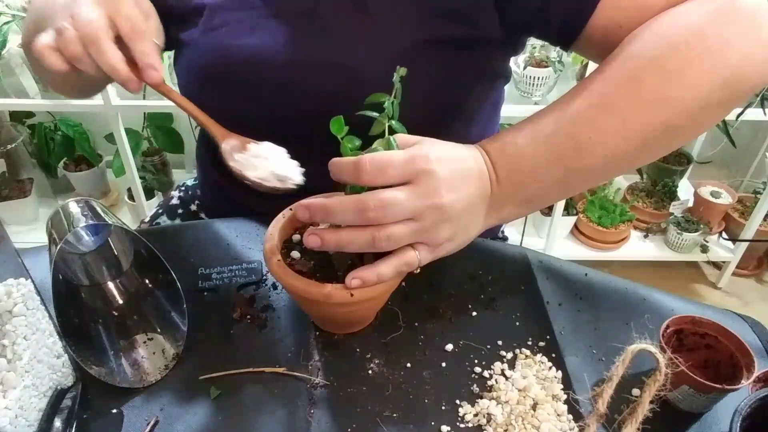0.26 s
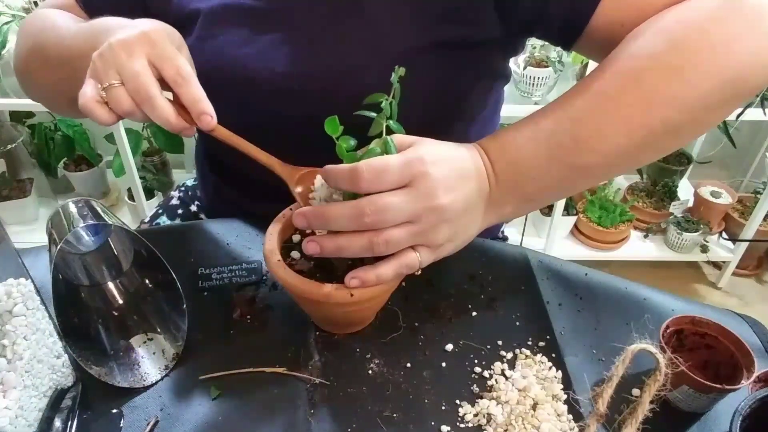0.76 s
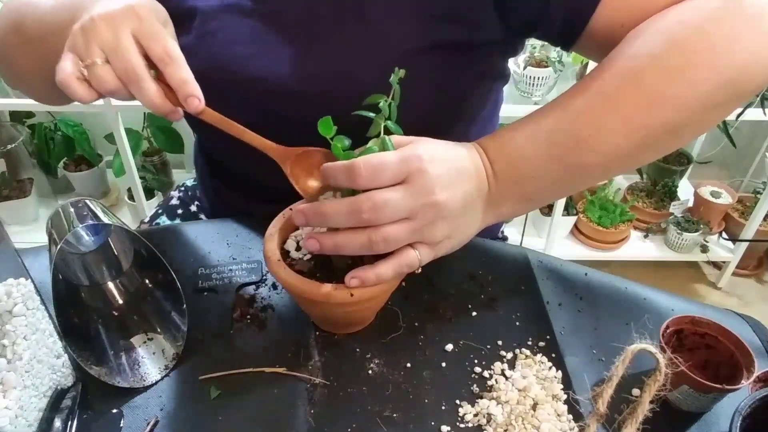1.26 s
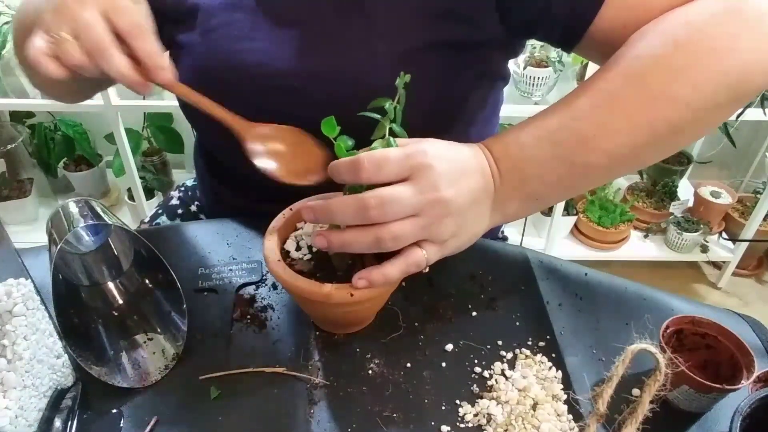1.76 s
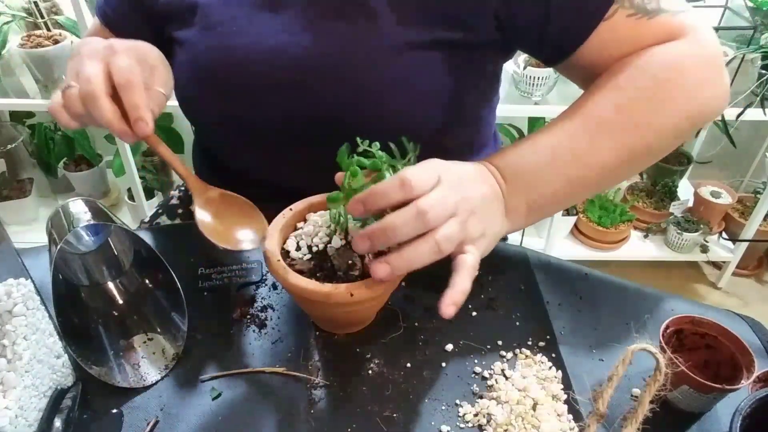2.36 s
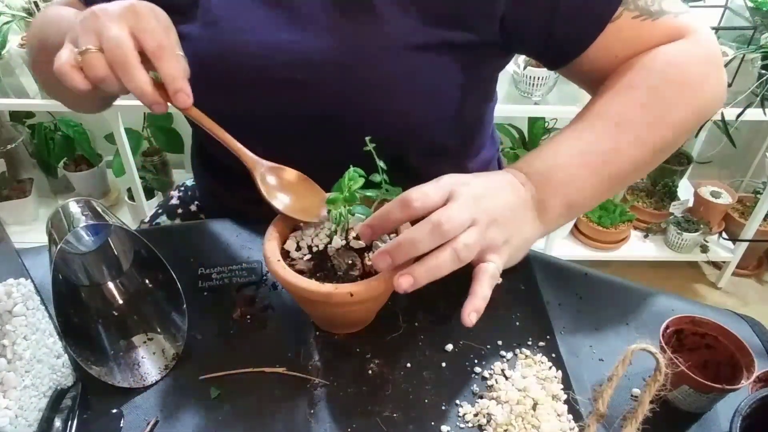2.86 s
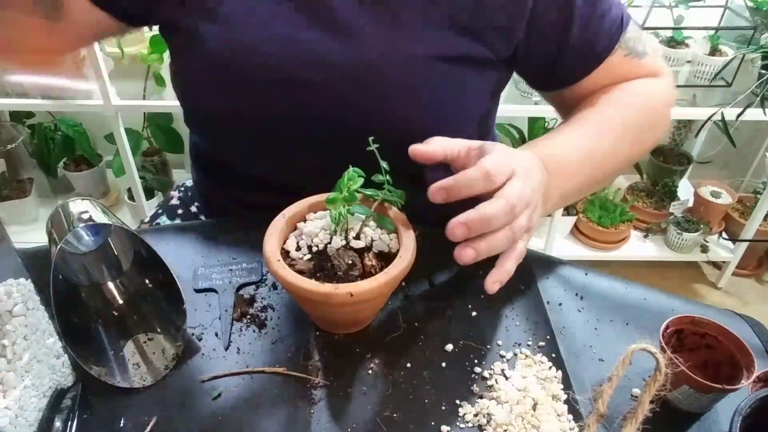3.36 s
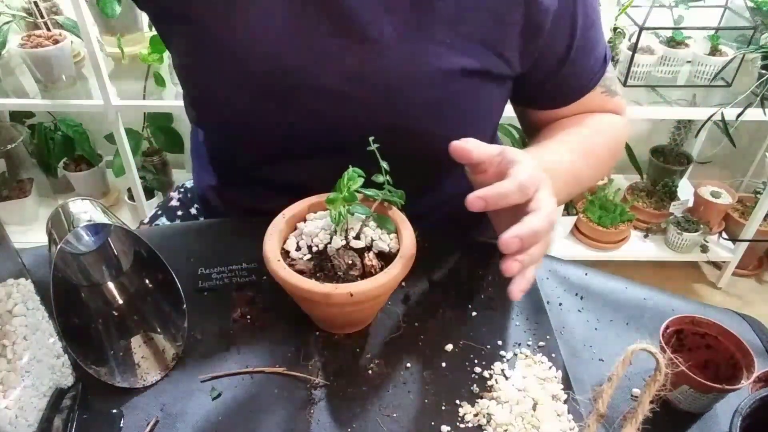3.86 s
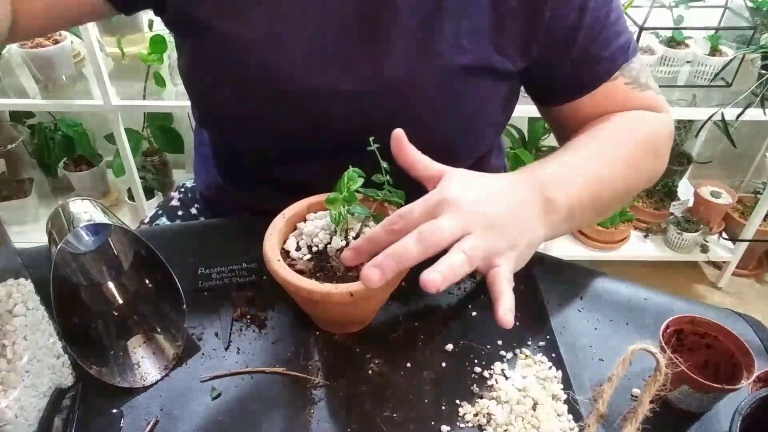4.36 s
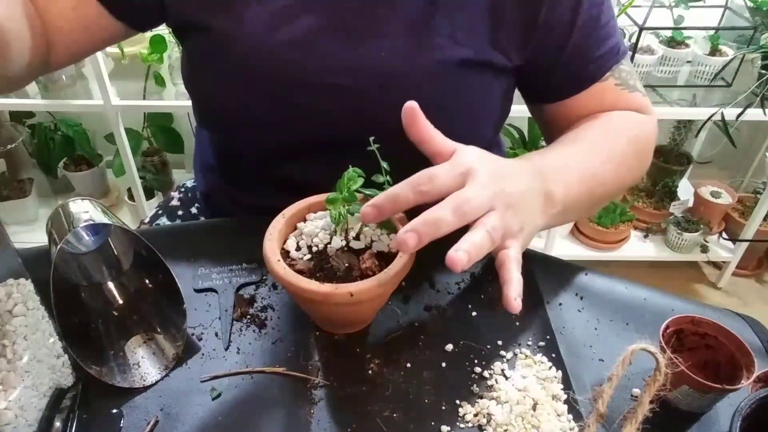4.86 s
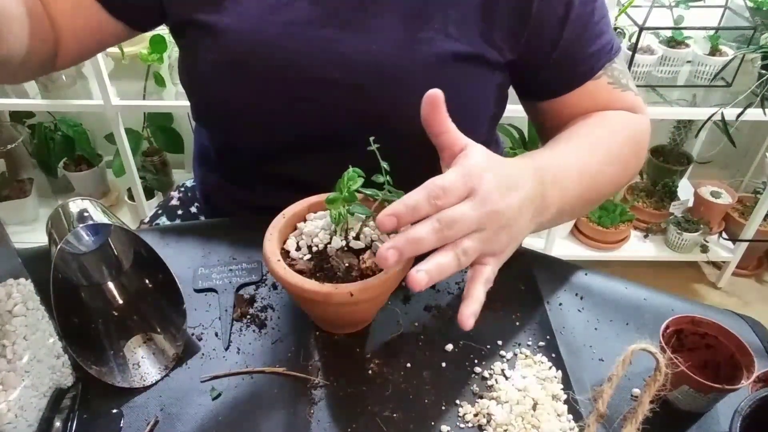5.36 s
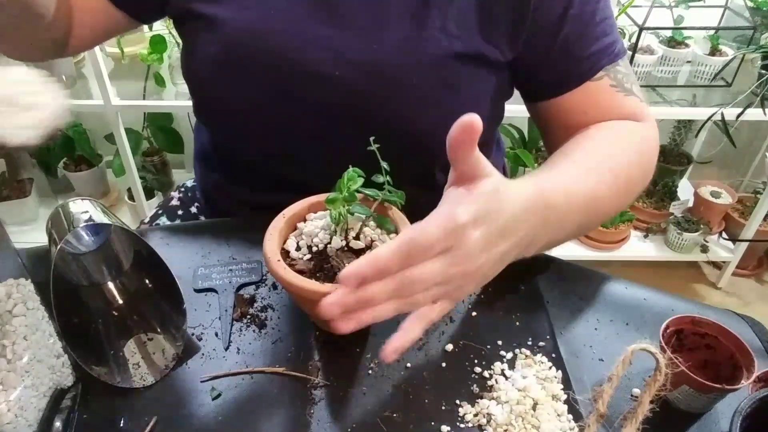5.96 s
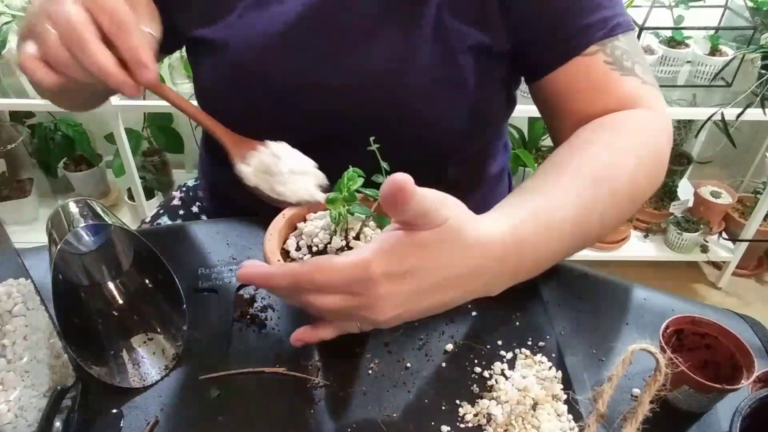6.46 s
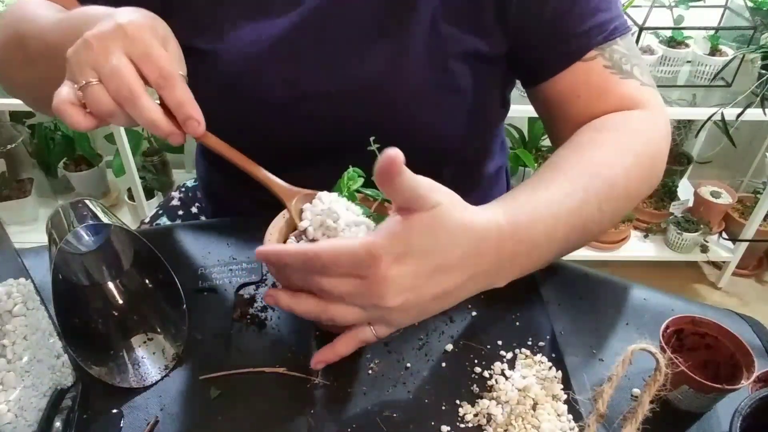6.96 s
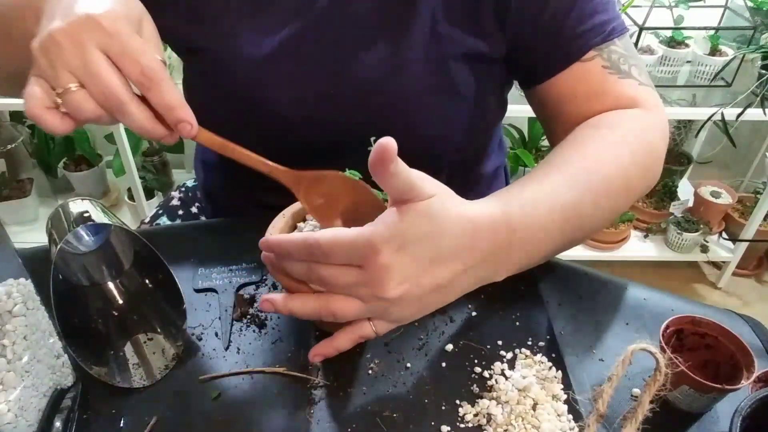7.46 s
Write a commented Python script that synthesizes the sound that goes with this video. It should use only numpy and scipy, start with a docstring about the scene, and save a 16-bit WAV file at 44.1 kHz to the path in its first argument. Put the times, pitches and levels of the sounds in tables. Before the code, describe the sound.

A soft pour of dry white granules into a terracotta pot, small spoon ticks, then near silence over faint hiss. Bright clacks on the pot rim come next, then a burst of much louder crunching as the spoon chatters and digs in a plastic bin of grains. After it quiets, stray grains tick, and another spoonful patters in. Close microphone, small indoor room.

```python
"""Light mineral grains are spooned into a clay pot in a quiet room, close to a small bright microphone.
First the pot bumps dully on the table; in a pour, grains patter on clay as a dense hail of tiny contacts,
spoon taps ring the pot's modes, and the last grains slide and spill. After more taps, the spoon knocks on
a plastic bin, chatters, digs and scrapes through it, with loud cracks made of clicks and short knocks.
Small spills and hard clinks follow, then a second pour. Reflections, hiss and a faint hum come from noise."""
import sys
import numpy as np
from scipy import signal
from scipy.fft import rfft, irfft
from scipy.io import wavfile

SR = 44100
rng = np.random.default_rng(int(sys.argv[2]) if len(sys.argv) > 2 else 0)


def int16_out(signal):
    """Quantize to a 16-bit WAV file."""
    q = np.round(np.clip(np.atleast_2d(signal).T, -1, 1) * 32767)
    wavfile.write(sys.argv[1], SR, q.astype(np.int16))


N = 340011

# Grains poured off the spoon into the pot, one curve per pour.
# Each row: time in seconds, crackle in dB, crunch in dB, rustle in dB.
POURS = [
    [(0.7, -72, -70, -63), (0.72, -66, -67.5, -64), (0.866, -64, -70, -80), (0.88, -46.5, -60, -64),
     (0.925, -43, -55, -64), (0.945, -49.5, -58, -68), (1.03, -42, -47, -56.5), (1.09, -35, -46, -61),
     (1.11, -40, -65, -63), (1.47, -55.5, -58, -67), (1.55, -66.5, -79, -74)],
    [(7.27, -72.5, -79.5, -84), (7.37, -39, -48.5, -62.5), (7.402, -50.5, -57, -65),
     (7.414, -37, -47.5, -62), (7.5, -34, -47.5, -63), (7.514, -42, -43, -67), (7.545, -36, -50, -64),
     (7.575, -34.5, -49, -59), (7.67, -44.5, -60, -63.5), (7.71, -76, -75, -73.5)],
]
# Spoon plunged into the bin, dragged through, lifted away full, one curve per dig.
# Each row: time in seconds, crackle in dB, crunch in dB, rustle in dB.
DIGS = [
    [(3.944, -36, -33.5, -59), (3.962, -23.5, -39.5, -47), (4.022, -19.5, -43, -48.5),
     (4.065, -24.5, -32, -39.5), (4.21, -27, -34.5, -39.5), (4.385, -53.5, -58, -57.5)],
    [(4.385, -48, -56, -58.5), (4.47, -24.5, -29, -46), (4.52, -35, -42, -53.5), (4.59, -29.5, -35, -49.5),
     (4.68, -31.5, -38.5, -53), (4.85, -29, -38.5, -52), (5.06, -31.5, -40.5, -55), (5.138, -20, -34, -50),
     (5.19, -28.5, -34, -54), (5.315, -29, -41.5, -49.5), (5.328, -27, -31.5, -50.5),
     (5.355, -38, -46, -52.5), (5.6, -75.5, -85, -74)],
    [(6.2, -86, -89, -83.5), (6.26, -62, -67.5, -68), (6.32, -54, -61, -67.5), (6.394, -67, -69.5, -75),
     (6.55, -72.5, -83, -77)],
]
# Sparkle against crackle: one value in dB for each pour, then one in dB for each dig.
POUR_SPARKLE_DB = [-11.5, -18]
DIG_SPARKLE_DB = [-14.5, -9.5, -11]
SPILL_SPARKLE_DB = -11.5   # spills and slides, against crackle
# Small spills of grains, sudden and dying away.
# Each row: time of the peak in seconds, crackle in dB, crunch against crackle in dB,
# time to sink 20 dB in seconds.
SPILLS = [(1.556, -46, -14, 0.04), (1.698, -58.5, 4, 0.05), (1.798, -55.5, -20, 0.22),
          (1.995, -64, -11.5, 0.3), (2.079, -61, -13.5, 0.16), (2.245, -72, -20, .15),
          (5.625, -66, -9, 0.2), (5.782, -66.5, -18, 0.2), (5.919, -71.5, -16, 0.5), (6.155, -66, -19, .2),
          (6.452, -66.5, -9, 0.4), (6.685, -71, -12, 2.1), (6.915, -50, -19, 0.05), (6.96, -64, -11, 0.5),
          (7.125, -62.5, -12, 0.3)]
SPILL_RISE_S = 0.016   # time to swell 20 dB
# Grains sliding on the clay wall, swelling before and sinking after a steady stretch.
# Each row: start of the steady stretch in seconds, its end in seconds, contact drive in dB.
SLIDES = [(1.565, 1.63, -91), (2.38, 2.453, -110), (2.487, 2.562, -107), (2.605, 2.719, -111)]
SLIDE_FADE_S = 0.035   # time to swell or sink 20 dB
SLIDE_CRACKLE_DB, SLIDE_CRUNCH_DB = 38, -14   # crackle against the contacts, crunch against the crackle
POUR_RING_DB = -47   # drive of the wall contacts against the crackle
# Loud sharp cracks: even stick-slip chatter of the spoon near 4 s, single loud grains elsewhere.
# Each row: time in seconds, crack peak in dB, knock pitch in Hz, knock drive against crack in dB.
SNAPS = [(0.8555, -38.5, 5820, 3), (0.8779, -24, 5700, -9), (0.8944, -22, 5540, -13.5),
         (0.957, -36, 5840, -1), (1.011, -28, 2814, -4.5), (1.0375, -23.5, 2640, -19),
         (1.0464, -20.5, 5990, -21.5), (1.0554, -27, 4900, -28), (1.2042, -21.5, 3810, -14),
         (1.2271, -25, 6130, 1), (1.3528, -30.5, 6130, -2), (1.3658, -27.5, 3470, -14),
         (1.514, -43, 3150, -16), (1.697, -34.5, 6030, -3), (1.7185, -36, 3850, -16),
         (1.8068, -38, 5630, -13), (3.8362, -29.5, 3090, -13.5), (3.9434, -1, 3120, -10),
         (3.9614, -0.5, 3200, -16.5), (3.9729, -1, 4113, -19.5), (3.9844, -2.5, 5400, -20.5),
         (4.0024, -4.5, 3783, -18), (4.0133, -3.5, 5486, -27), (4.0244, 1.5, 6140, -20),
         (4.0364, -3, 5470, -19.5), (4.0434, -0.5, 4966, -16), (4.0584, -1.5, 5380, -15.5),
         (4.0664, -4, 5865, -17.5), (4.0784, -6.5, 5520, -14), (4.0914, -7.5, 4860, -10.5),
         (4.1274, -7.5, 4380, -8.5), (4.4119, -23.5, 3320, -20.5), (4.5406, -19.5, 3400, 4),
         (4.5795, -6.5, 3910, -4), (4.6527, -14, 3380, -20.5), (4.6616, -9.5, 4560, -23.5),
         (4.7895, -12, 3640, -14), (4.8253, -12, 4080, -11.5), (4.851, -14.5, 5090, -13.5),
         (4.9072, -12, 3860, -13), (4.9684, -11.5, 4250, -19), (5.13, -3.5, 4902, -9.5),
         (5.1604, -9, 4970, -12), (5.1925, -7.5, 5040, -16), (5.213, -4, 5080, -20),
         (5.2444, -16.5, 2930, -29), (5.256, -11.5, 3050, -14.5), (5.2886, -8.5, 3140, -16),
         (5.3243, -6.5, 3160, -13), (5.3842, -19, 2570, -3.5), (5.537, -44, 3390, -23.5),
         (7.3302, -31.5, 5360, -2.5), (7.3687, -33, 5830, -8.5)]
# Lesser cracks: candidates drawn per second, then dB: base against crackle, random spread, knock against crack
CHANCE_PER_S, CHANCE_DB, CHANCE_SPREAD_DB, CHANCE_KNOCK_DB = 55, 9.5, 3.0, -15
# Taps on the pot; the first row is the pot bumping dully on the table.
# Each row: time in seconds, crack peak in dB, knock peak in dB, thud drive in dB,
# ring drive in dB, hardness in dB per octave, freedom to ring from 0 to 1.
TAPS = [(0.6383, -36.5, -35, -31, -63, -19.5, 0.7), (1.0879, -20, -44, -62, -74, 15, 0.7),
        (1.1696, -24, -42, -60, -66, 12, 0.14), (1.2933, -24, -48, -60, -77.5, 6.5, 0.7),
        (1.4544, -41, -44, -66, -57, -1.5, 0.45), (1.5551, -40, -64, -63, -50, 5.5, 0.83),
        (1.5973, -39, -59, -80.5, -55, 0.5, 0.8), (1.6142, -28, -48, -62, -54, -3, 0.8),
        (1.6322, -42, -47, -63, -50, 1.5, 0.32), (2.9947, -12.5, -32.5, -68, -61.5, -7, .7),
        (3.0522, -4.5, -12, -36.5, -39.5, -7.7, 1), (3.2479, -15, -10.5, -34.5, -38, -7.5, 0.7),
        (7.4128, -14, -46, -63, -67, 15.5, 0.8), (7.4664, -19, -44.5, -58, -55, 8.7, 1),
        (7.5113, -3.5, -43, -50, -35.5, 2.5, 0.86), (7.5738, -8.5, -49, -63, -43, 4, 0.9),
        (7.65, -19, -50, -63, -46, 5, 0.12)]
# Knocks on the bin. Each row: time in seconds, crack peak in dB, knock peak in dB, thud drive in dB,
# ring drive in dB, hardness in dB per octave, freedom to ring from 0 to 1.
KNOCKS = [(3.7847, -14, -13.5, -75, -38.5, -1.8, 0.53), (3.9488, -1.5, -20.5, -76, -36.5, 8.3, 0.7),
          (4.4814, -15, -8.5, -81, -52, 5, 0.3), (4.6458, -6, -19.5, -58, -41, 25, 0.42),
          (5.42, -23, -25.5, -68, -51, 0, 0), (5.4889, -31, -44, -53, -83.5, 3.5, 0.56),
          (5.6166, -27.5, -39, -56, -66.5, -10.5, 0)]
# Small hard clinks. Each row: time in seconds, crack peak in dB, knock peak in dB, thud drive in dB,
# ring drive in dB, hardness in dB per octave, freedom to ring from 0 to 1.
CLINKS = [(6.9032, -40, -68, -82.5, -69, -12.5, 0.8), (6.9157, -40, -61, -79, -68, -3, 0.77),
          (7.1348, -46, -52, -79.5, -74, -3, 0.5), (7.151, -56, -58.5, -82, -67, -1.5, 0.57)]
# Spoon scraping the bin wall. Each row: time of the peak in seconds, contact drive in dB.
SCRAPES = [(4.508, -74.5), (4.63, -86), (4.767, -66.5), (5.034, -71.5), (5.144, -63.5), (5.25, -66),
           (5.35, -80)]
SCRAPE_RISE_S, SCRAPE_FALL_S = 0.07, 0.046   # time to swell and to sink 20 dB

# Modes of the clay pot: pitches in Hz. Each row of the second: relative level in dB, free t60 in seconds.
POT_HZ = [1400, 3714, 5415, 6742, 7370, 8600, 8860, 9184, 10320, 10820, 11700, 12350, 13200, 14420]
POT = [(-10.5, 0.12), (-1.5, 0.085), (-12.5, 0.12), (-8.5, 0.07), (-13, 0.059), (-15, 0.18), (-17, 0.21),
       (-21.5, 0.13), (-12.5, 0.096), (-20.5, 0.07), (-16.5, 0.092), (-14.5, 0.084), (-12, .1),
       (-16.5, .08)]
# Modes of the plastic bin: pitches in Hz. Each row of the second: relative level in dB, free t60 in seconds.
BIN_HZ = [759, 1152, 1680, 1910, 2213, 2530, 3004, 3090, 3984, 4430, 4963]
BIN = [(-4, .16), (-7, .1), (-2, .07), (-10, .05), (-2, .13), (-10, .05), (-1, .16), (-3, .14), (-9, .08),
       (-13, .08), (-14, .08)]
# Modes of the clinking part: pitches in Hz. Each row of the second: relative level in dB, free t60 in seconds.
CLINK_HZ = [1997, 3700, 4200, 5850, 6100, 8005]
CLINK = [(-3, .09), (1, .2), (-8, .12), (-3, .25), (-8, .12), (-14, .12)]
# Modes of the table top: pitches in Hz. Each row of the second: relative level in dB, t60 in seconds.
TABLE_HZ = [160, 238, 265, 295.4, 417, 560]
TABLE = [(-9, 0.041), (-2.5, 0.023), (-7, 0.17), (1, 0.054), (-12, 0.025), (-16.5, 0.018)]

# Filter colour of the crackle. Each row: frequency in Hz, relative level in dB.
FINE = [(3000, -42.5), (6000, -18), (7500, 0), (9000, 3.5), (11000, 1), (12500, -12), (16000, -25.5)]
# Filter colour of the crunch and of the short knocks under the cracks. Each row: frequency in Hz, relative level in dB.
COARSE = [(250, -45), (1000, -30.5), (1550, -2.5), (2200, -3.5), (3500, 2), (5000, 1.5), (6500, -6),
          (8000, -22.5)]
# Filter colour of the rustle. Each row: frequency in Hz, relative level in dB.
RUSTLE = [(60, -11.5), (150, -1.5), (300, -6.5), (600, -3.5), (1100, -7.5), (1800, -23.5)]
# Filter colour of the sparkle. Each row: frequency in Hz, relative level in dB.
SPARKLE = [(7000, -33.5), (10500, -9), (12000, 6.5), (14000, 3.5), (16000, -7.5)]
# Filter colour of the loud and lesser cracks. Each row: frequency in Hz, relative level in dB.
CRACK = [(3000, -36), (6000, -11.5), (7500, -5), (9000, 4), (11000, -3), (13000, -1.5), (16000, 2)]
# Filter colour of the crack of a blow. Each row: frequency in Hz, relative level in dB.
RAP = [(3000, -38.5), (6000, -14), (7500, -3), (9000, 4.5), (11000, -7), (13500, -7.5), (16000, -17.5)]
# Filter colour of the knock of a blow. Each row: frequency in Hz, relative level in dB.
KNOCK = [(200, -41), (600, -6.5), (1200, -1.5), (2200, -4.5), (3500, -1), (5000, -8.5), (6500, -17.5),
         (8000, -34.5)]

# Decay of the dense reflections. Each row: frequency in Hz, t60 in seconds.
ROOM_T60 = [(100, 0.14), (1000, .28), (4000, 0.26), (9000, 0.045), (16000, 0.33)]
ROOM_DB = -3
EARLY_DB, EARLY_T60_S = 2.5, 0.058   # added first reflections of table and nearby things, with extra fade
# Boosts of the microphone port. Each row: frequency in Hz, width in Hz, gain in dB.
MIC = [(8620, 2400, 7.5), (9170, 7630, 13), (7260, 890, 2)]
MIC_LOW_CUT_HZ, COUPLING_CUT_HZ, CUTOFF_HZ = 230, 100, 16250
# Filter colour of the steady hiss. Each row: frequency in Hz, relative level in dB.
HISS = [(15, -53.5), (25, -18), (85, -22), (108, -7.5), (182, -5.5), (378, -8.5), (433, -5), (510, -8.5),
        (651, -11.5), (878, -12.5), (1010, -13), (4360, -20), (6550, -23), (14800, -16.5), (16500, -35)]
HISS_DB = -69
HUM_HZ, HUM_WIDTH_HZ, HUM_DB = 440, 10, -81.5


def grains(fine_db, coarse_db, low_db, top_db):
    """One hail of contacts heard as crackle, crunch, rustle and sparkle, over the hiss of the finest dust."""
    hail = contacts(per_s=2000, spread_db=3.5)
    dust = rng.standard_normal((4, N))
    fine_grains = pitched(hail, 6500, 12500, cycles=20)
    coarse_grains = pitched(hail, 1500, 6500, cycles=11)
    crackle = coloured(0.62 * hail + fine_grains + 0.4 * dust[0], FINE)
    crunch = coloured(0.74 * hail + coarse_grains + 0.19 * dust[1], COARSE)
    rustle = coloured(hail + 1.7 * dust[2], RUSTLE)
    sparkle = coloured(hail + 0.24 * dust[3], SPARKLE)
    layers = zip((fine_db, coarse_db, low_db, top_db), (crackle, crunch, rustle, sparkle))
    return sum(from_db(db) * heard(layer) for db, layer in layers)


def pitched(hail, low_hz, high_hz, cycles):
    """Grains differ in size: each contact rings briefly at one of twelve pitches."""
    dealt = rng.integers(0, 12, N)
    tones = 0
    for k, hz in enumerate(np.geomspace(low_hz, high_hz, 12)):
        tones = tones + ring(hail * (dealt == k), hz, cycles / hz) / np.sqrt(cycles / hz)
    return rms_one(tones)


def contacts(per_s, spread_db):
    """Small contacts at random moments: clicks of either sign and uneven size, scaled to rms 1."""
    sizes = from_db(spread_db * np.minimum(rng.exponential(1, N), 4)) * rng.choice([-1, 1], N)
    return rms_one(sizes * (rng.random(N) < per_s / SR))


def movement():
    """Crackle, crunch, rustle and sparkle levels of all that moves; spills and slides are too light to rustle."""
    s, db, crunch_db, fall_s = np.transpose(SPILLS)
    spills = swells(s, s, db, SPILL_RISE_S, fall_s)
    sliding = slide_db() + SLIDE_CRACKLE_DB
    light = np.max([sliding, *spills], axis=0)
    fine, coarse, low = np.transpose([in_time(move) for move in POURS + DIGS], axes=(1, 0, 2))
    top = fine + np.array(POUR_SPARKLE_DB + DIG_SPARKLE_DB)[:, None]
    crackle_db = np.max([light, *fine], axis=0)
    crunches = [*coarse, sliding + SLIDE_CRUNCH_DB, *(spills + crunch_db[:, None])]
    sparkle_db = np.max([light + SPILL_SPARKLE_DB, *top], axis=0)
    return crackle_db, np.max(crunches, axis=0), low.max(axis=0), sparkle_db


def pour_db():
    """Crackle level of the flow off the spoon."""
    return np.max([in_time(pour)[0] for pour in POURS], axis=0)


def slide_db():
    """Drive of the contacts sliding on the clay wall."""
    start, end, db = np.transpose(SLIDES)
    return swells(start, end, db, SLIDE_FADE_S, SLIDE_FADE_S).max(axis=0)


def snaps(rows):
    """Sharp cracks of grains or of the chattering spoon, each with a short knock at its own pitch."""
    s, crack_db, knock_hz, knock_db = np.transpose(rows)
    out = bursts(s, crack_db, CRACK, t60=0.012)
    knocks = bursts(s, crack_db + knock_db, COARSE, t60=0.0015)
    for start, hz in zip(np.round(s * SR).astype(int), knock_hz):
        part = knocks[start:start + 600]
        out[start:start + 600] += 0.5 * part + 0.077 * ring(part, hz, 68 / hz)
    return out


def chance_snaps(fine_db):
    """Rows for lesser cracks at random moments; their level follows the crackle and the faintest are left out."""
    count = int(CHANCE_PER_S * N / SR)
    when, size, pitch = rng.random((count, 3)).T
    db = fine_db[(when * N).astype(int)] + CHANCE_DB - CHANCE_SPREAD_DB * np.log(size + 0.15)
    rows = np.transpose([when * (N - 1) / SR, db, 2800 * 2 ** pitch, np.full(count, CHANCE_KNOCK_DB)])
    return rows[db > -48]


def blows(table, modes_hz, modes):
    """Crack and knock of the contact, thud of the table, ring of the body."""
    s, crack_db, knock_db, thud_db, ring_db, hard_db, free = np.transpose(table)
    contact = bursts(s, crack_db, RAP, t60=0.0042) + bursts(s, knock_db, KNOCK, t60=0.0065)
    thud = struck(s, thud_db, TABLE_HZ, TABLE, hard_db=2.5, free=1, split=0.15)
    body = struck(s, ring_db, modes_hz, modes, hard_db, free, split=0.011)
    return contact + thud + body


def bursts(times, peak_db, spectrum, t60):
    """Each blow is a click followed by a few milliseconds of dying noise."""
    out = np.zeros(N + 600)
    fade = from_db(-60 * np.arange(600) / SR / t60)
    for s, db in zip(times, peak_db):
        noise = rng.standard_normal(600) * fade
        noise[0] += 3 * np.sign(noise[0])
        burst = coloured(noise, spectrum)
        heard_peak = np.abs(microphone(burst)).max()
        out[round(s * SR):][:600] += from_db(db) * burst / heard_peak
    return out[:N]


def struck(times, drive_db, modes_hz, modes, hard_db, free, split):
    """Each blow rings every mode as a close, beating pair; hardness tilts the modes, touch damps them."""
    out = np.zeros(N + SR // 4)
    t = np.arange(SR // 4)[:, None] / SR
    hz, (mode_db, t60) = np.array(modes_hz), np.transpose(modes)
    for s, db, hard, share in np.broadcast(times, drive_db, hard_db, free):
        own, apart = rng.uniform(-1.7, 1, (2, len(hz)))   # uneven level and gap for each mode
        level = from_db(db + mode_db + 3 * own + hard * np.log2(hz / 3000))
        half_gap = split * (1 + apart / 2) / 2
        lower = np.sin(2 * np.pi * hz * (1 - half_gap) * t)
        upper = np.sin(2 * np.pi * hz * (1 + half_gap) * t)
        fade = from_db(-60 * t / (t60 * np.clip(share, 0.1, 1)))
        out[round(s * SR):][:len(t)] += (level * fade * (lower + 0.8 * upper)).sum(axis=1)
    return out[:N]


def rubbed(modes_hz, modes, level_db, hard_db, spread_db):
    """Dense small contacts keep the modes of a wall singing."""
    hail = from_db(level_db) * contacts(per_s=1500, spread_db=spread_db)
    singing = 0
    for hz, (db, t60) in zip(modes_hz, modes):
        singing = singing + from_db(db + hard_db * np.log2(hz / 2000)) * ring(hail, hz, t60)
    return singing


def scrape_db():
    """Drive of the spoon against the bin wall, one swell per scrape."""
    s, db = np.transpose(SCRAPES)
    return swells(s, s, db, SCRAPE_RISE_S, SCRAPE_FALL_S).max(axis=0)


def room(x):
    """Dense reflections: noise that swells in within a millisecond and dies band by band."""
    t, tail = np.arange(SR // 2) / SR, 0
    edges = 80 * 2 ** np.arange(0, 8.1, 1)   # octave bands
    for low, high in zip(edges, edges[1:]):
        octave = signal.butter(2, [low, high], "band", fs=SR, output="sos")
        band = signal.sosfilt(octave, rng.standard_normal(len(t)))
        tail = tail + band * from_db(-60 * t / at_hz(ROOM_T60, np.sqrt(low * high)))
    early = from_db(EARLY_DB - 60 * t / EARLY_T60_S)
    tail = tail * np.clip(t / 0.00079, 0, 1) * (1 + early)
    return signal.oaconvolve(x, tail / np.sqrt(np.sum(tail ** 2)))[:N]


def microphone(x):
    """Low cut, then the resonant boosts of the microphone port."""
    x = signal.lfilter(*signal.butter(2, MIC_LOW_CUT_HZ, "high", fs=SR), x)
    for hz, width_hz, gain_db in MIC:
        a, w, d = from_db(gain_db / 2), 2 * np.pi * hz / SR, np.pi * width_hz / SR
        zeros = [1 + d * a, -2 * np.cos(w), 1 - d * a]
        poles = [1 + d / a, -2 * np.cos(w), 1 - d / a]
        x = signal.lfilter(zeros, poles, x)
    return x


def background():
    """Steady hiss of coloured noise, and a faint wavering hum from a noise-driven resonance."""
    hiss = coloured(rng.standard_normal(N), HISS)
    hum = ring(rng.standard_normal(N), HUM_HZ, 2.2 / HUM_WIDTH_HZ)
    return from_db(HISS_DB) * rms_one(hiss) + from_db(HUM_DB) * rms_one(hum)


def from_db(db):
    """Gain of a level in dB."""
    return 10 ** (np.asarray(db) / 20)


def rms_one(x):
    """Scaled to rms 1."""
    return x / np.sqrt(np.mean(x ** 2) + 1e-20)


def heard(x):
    """Scaled to rms 1 as the microphone picks it up."""
    return x / np.sqrt(np.mean(microphone(x) ** 2))


def at_hz(points, hz):
    """A curve over frequency read on a log-frequency axis."""
    points_hz, values = np.array(points).T
    return np.interp(np.log(hz + 1), np.log(points_hz), values)


def in_time(rows):
    """Columns of a level curve in dB at every sample, practically silent outside its span."""
    s, *columns = np.transpose(rows)
    return [np.interp(np.arange(N) / SR, s, c, left=-120, right=-120) for c in columns]


def swells(rises_end, falls_start, db, rise_s, fall_s):
    """Level in dB of each swell (rows): rise, hold, fall."""
    t = np.arange(N) / SR
    rises_end, falls_start, db, fall_s = (np.reshape(v, (-1, 1)) for v in (rises_end, falls_start, db, fall_s))
    early = (rises_end - t) / max(rise_s, 0.002)
    late = (t - falls_start) / np.maximum(fall_s, 0.01)
    return db - 20 * np.maximum(np.maximum(early, late), 0)


def coloured(x, spectrum):
    """A causal (minimum-phase) filter with the given spectrum, by folding its cepstrum."""
    cepstrum = irfft(np.log(from_db(at_hz(spectrum, np.linspace(0, SR / 2, 2049)))))
    cepstrum[1:2048] *= 2
    cepstrum[2049:] = 0
    return signal.oaconvolve(x, irfft(np.exp(rfft(cepstrum))))[:len(x)]


def ring(clicks, hz, t60):
    """A two-pole resonance: a unit click sets a wave of about height 1 ringing."""
    r, w = from_db(-60 / (t60 * SR)), 2 * np.pi * hz / SR
    return signal.lfilter([1, 0, -1], [1, -2 * r * np.cos(w), r * r], clicks + 1e-18) / 2


def scene():
    """Everything near the pot, with its reflections."""
    levels = movement()
    near = grains(*levels) + snaps(np.vstack([SNAPS, chance_snaps(levels[0])]))
    near += blows(TAPS, POT_HZ, POT) + blows(KNOCKS, BIN_HZ, BIN) + blows(CLINKS, CLINK_HZ, CLINK)
    wall_db = np.maximum(slide_db(), pour_db() + POUR_RING_DB)
    near += rubbed(POT_HZ, POT, wall_db, hard_db=-0.5, spread_db=3)
    # the spoon scraping the wall sets only the lowest mode of the bin singing
    near += rubbed(BIN_HZ[:1], BIN[:1], scrape_db(), hard_db=1.5, spread_db=-0.5)
    return (near + from_db(ROOM_DB) * room(near))[None]


def record(dry):
    """Port colour, rounded peaks, bass cut of the coupling, background hiss and hum, cut top."""
    rounded = 0.65 * np.tanh(microphone(dry) / 0.65)
    coupled = signal.lfilter(*signal.butter(1, COUPLING_CUT_HZ, "high", fs=SR), rounded)
    top_cut = signal.cheby2(20, 70, CUTOFF_HZ, fs=SR, output="sos")
    return signal.sosfilt(top_cut, coupled + background())


dry = scene()
out = record(dry)
int16_out(out)
```